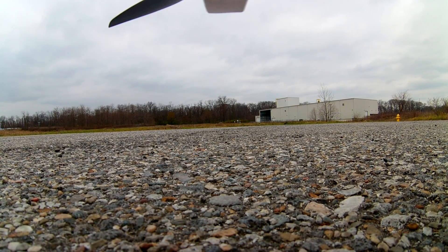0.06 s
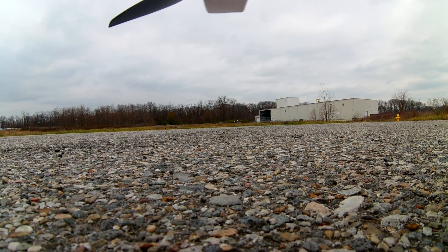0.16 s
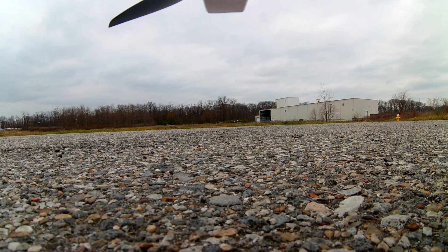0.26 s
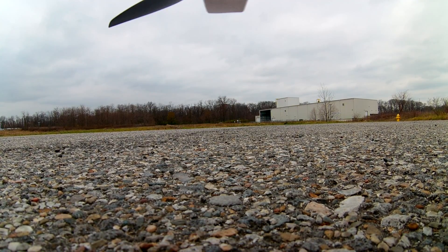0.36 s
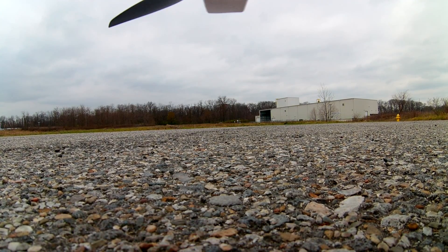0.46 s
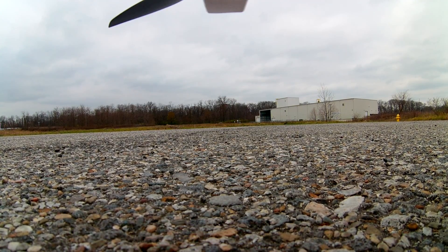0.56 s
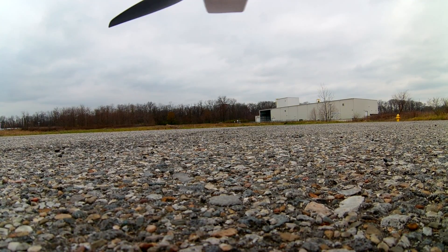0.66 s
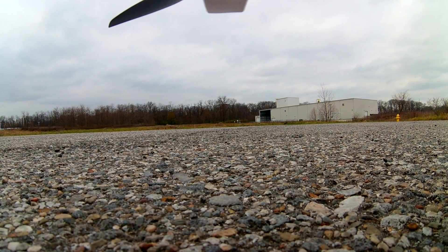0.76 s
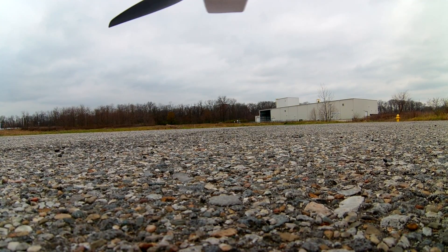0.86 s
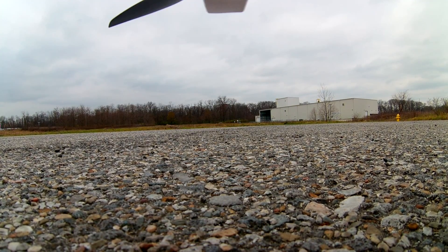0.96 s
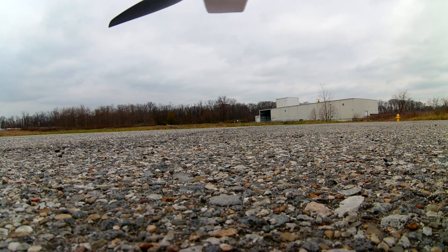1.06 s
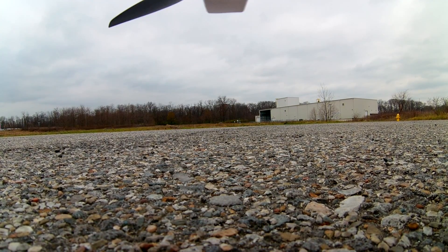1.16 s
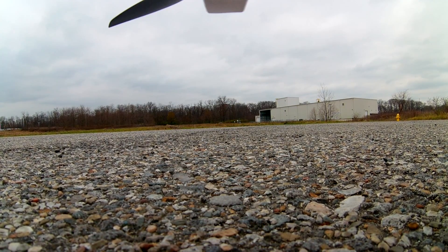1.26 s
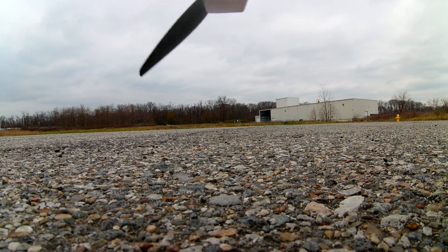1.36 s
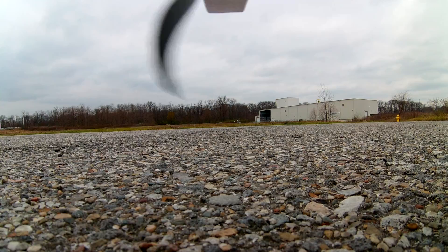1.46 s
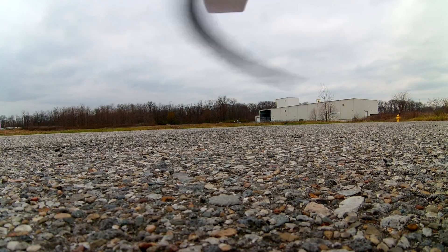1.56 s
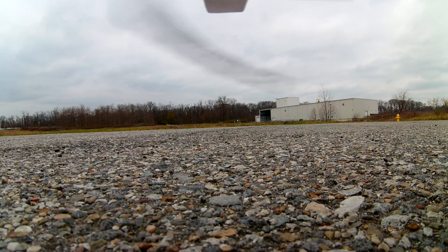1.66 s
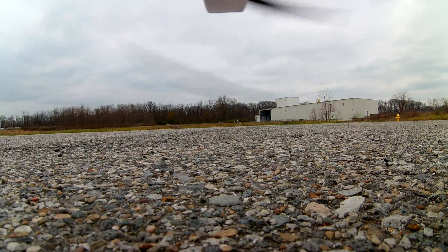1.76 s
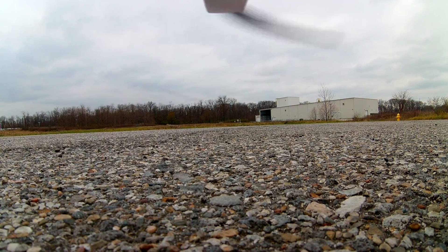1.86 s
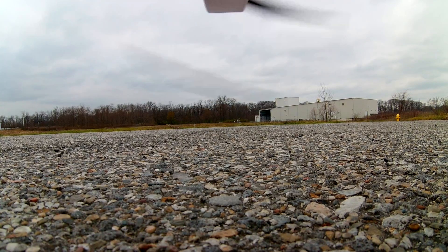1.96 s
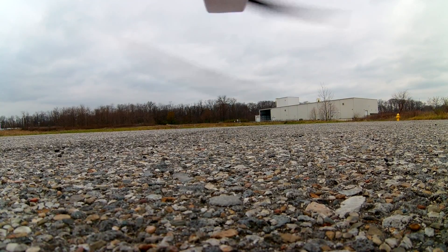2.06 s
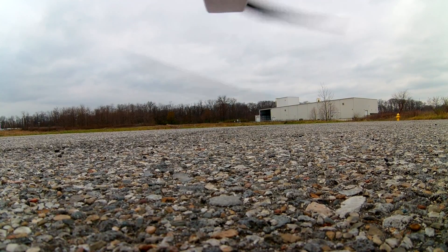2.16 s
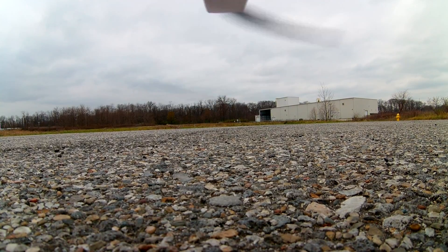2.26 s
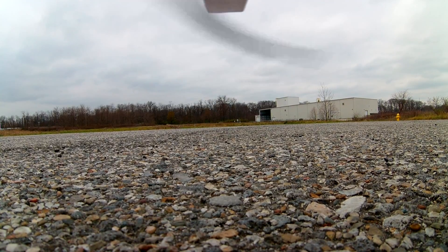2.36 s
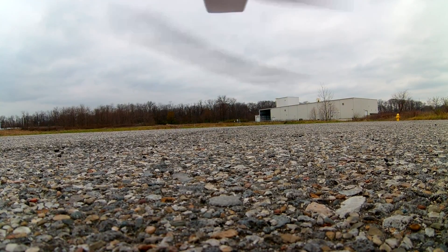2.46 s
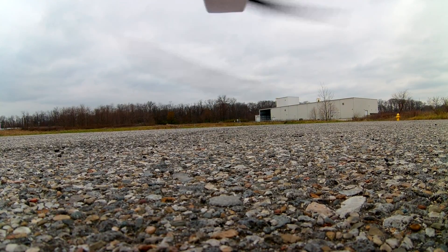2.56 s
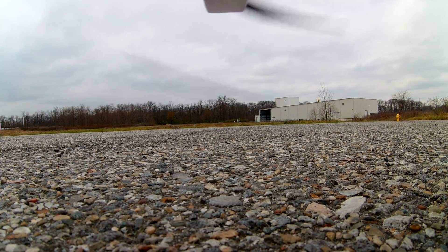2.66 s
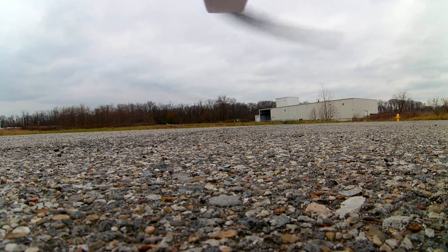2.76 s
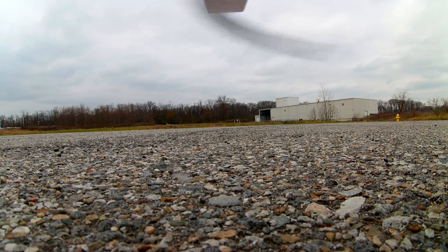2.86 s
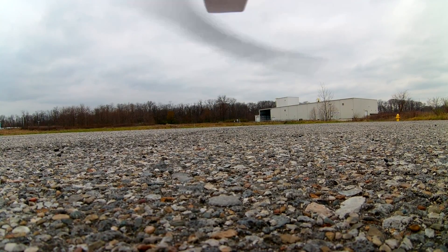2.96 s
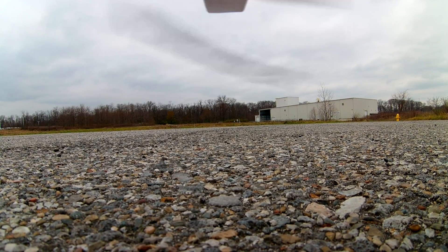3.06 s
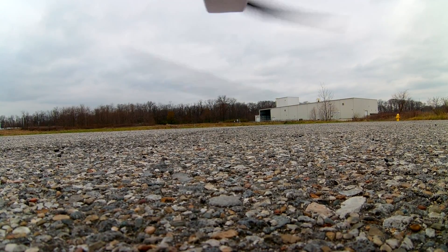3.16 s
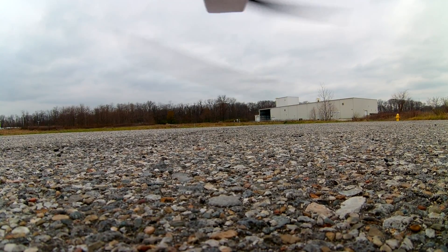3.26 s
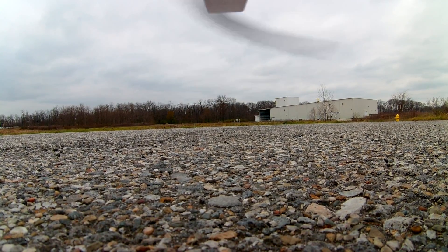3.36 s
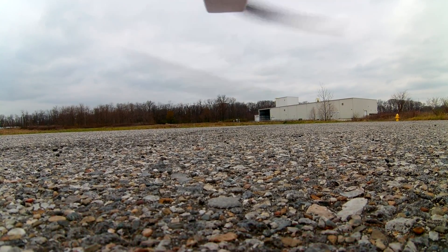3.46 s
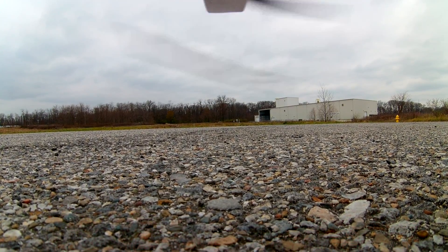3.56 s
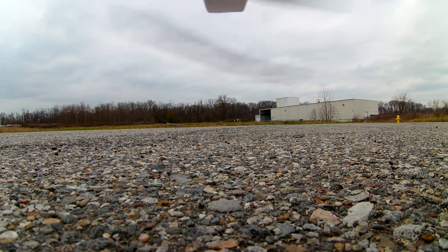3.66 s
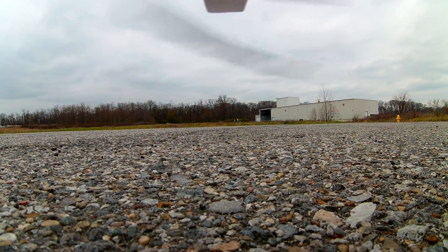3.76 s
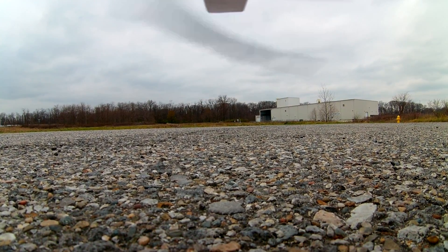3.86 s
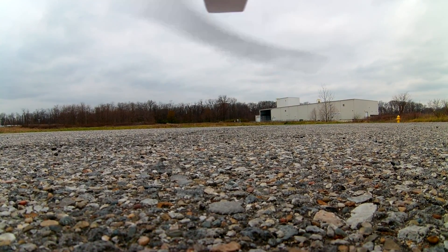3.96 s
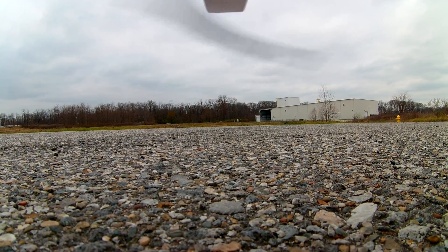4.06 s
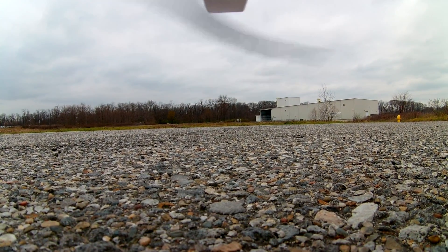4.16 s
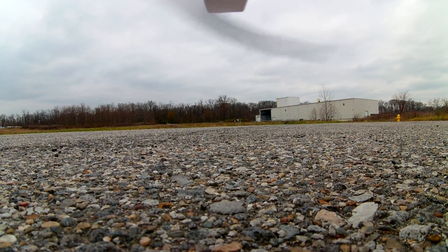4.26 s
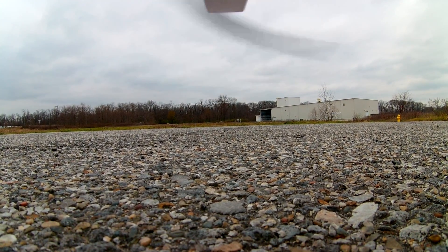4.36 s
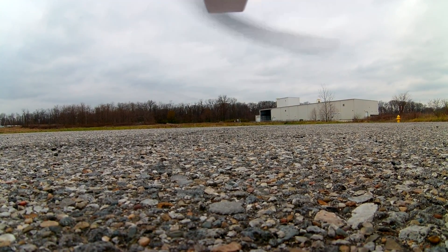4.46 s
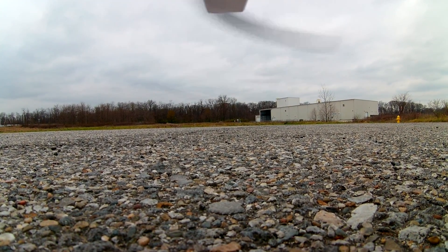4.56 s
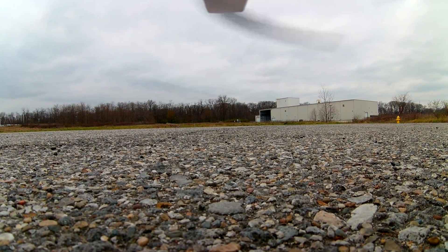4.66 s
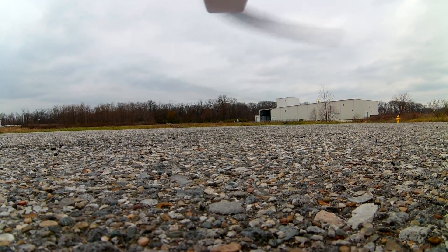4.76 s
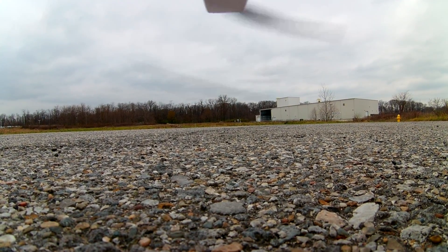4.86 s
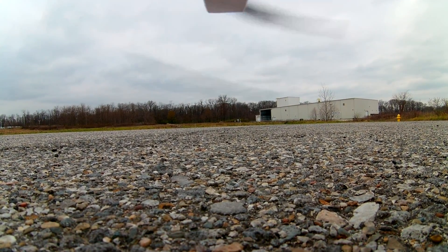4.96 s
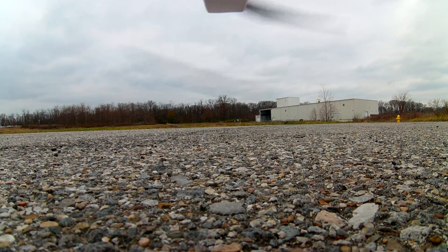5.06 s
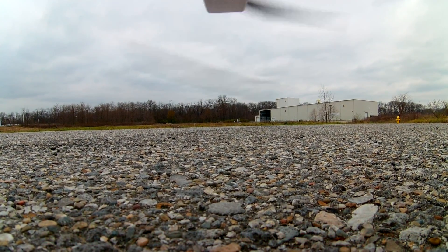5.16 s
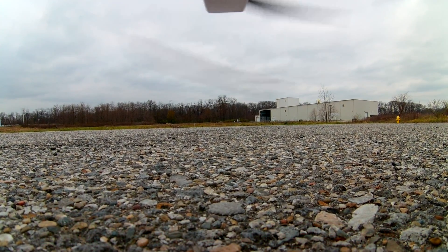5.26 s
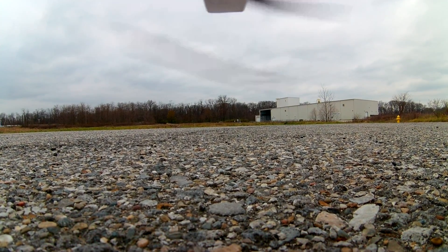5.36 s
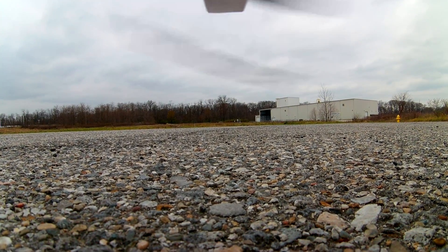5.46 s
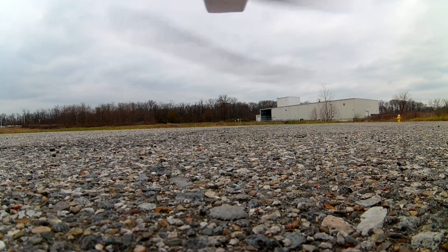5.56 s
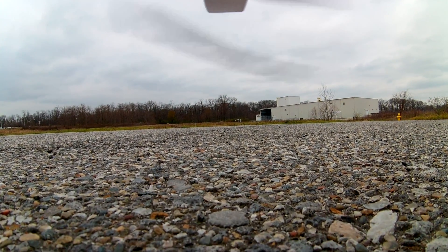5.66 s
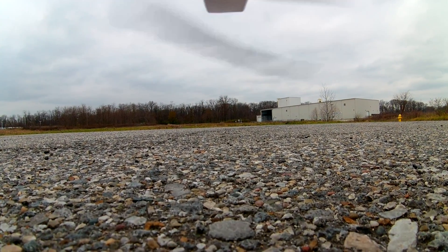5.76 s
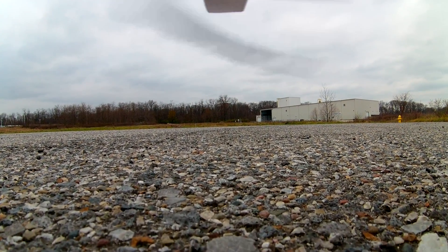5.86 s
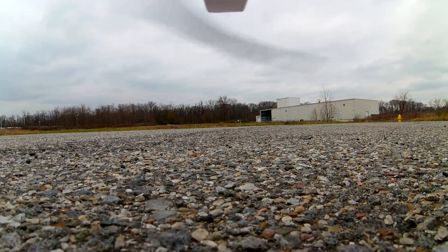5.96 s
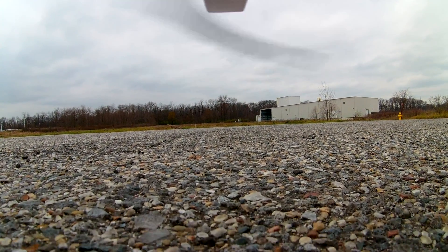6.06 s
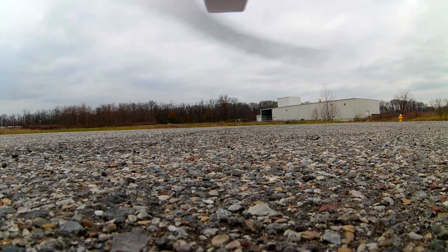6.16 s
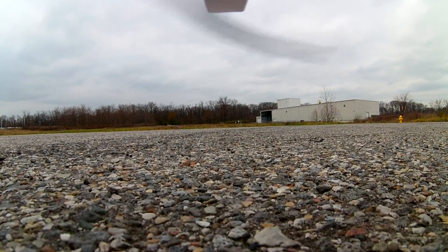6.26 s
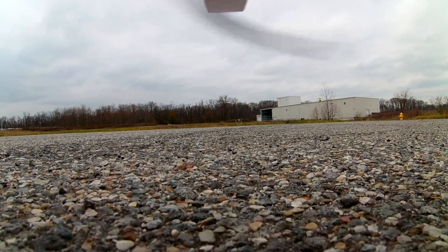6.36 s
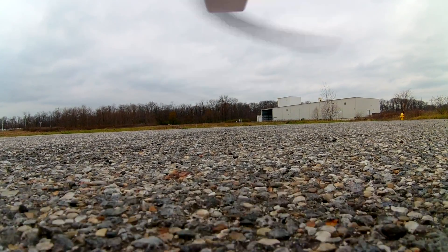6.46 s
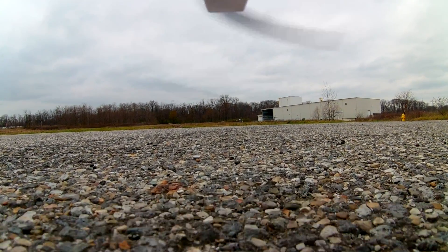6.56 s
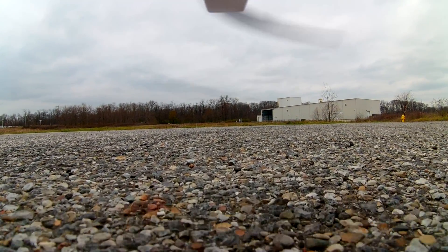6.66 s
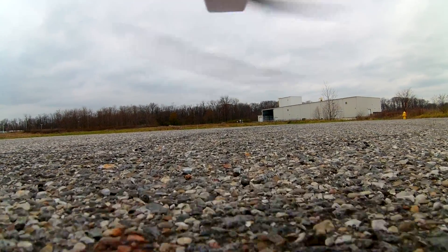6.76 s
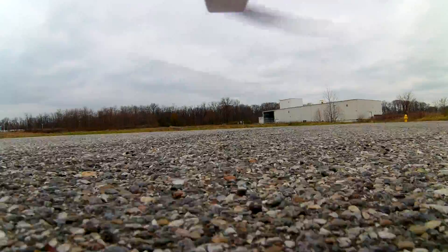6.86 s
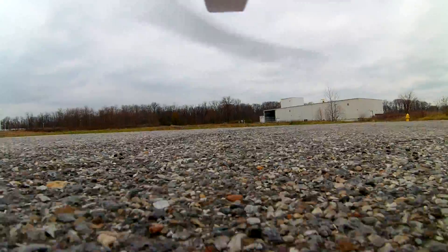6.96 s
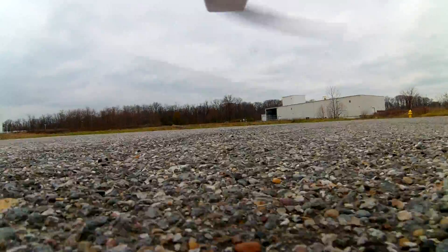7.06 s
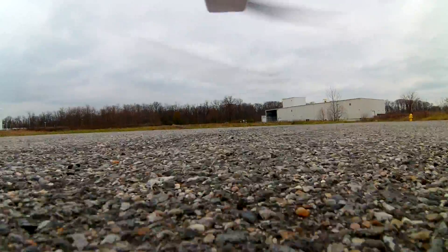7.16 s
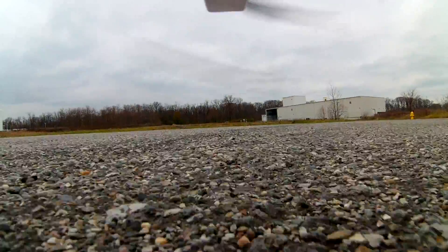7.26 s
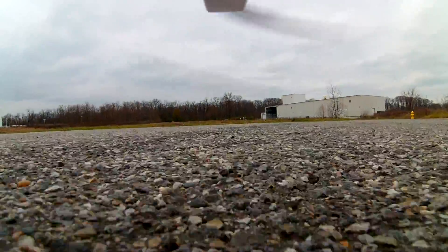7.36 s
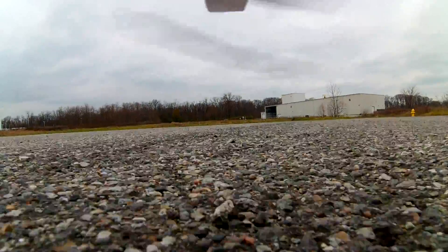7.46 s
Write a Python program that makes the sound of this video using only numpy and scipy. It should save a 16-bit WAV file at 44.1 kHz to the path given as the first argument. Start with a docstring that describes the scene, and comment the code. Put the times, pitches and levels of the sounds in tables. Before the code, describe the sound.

After faint scratchy ticks, a model plane's electric propeller starts and whirrs loudly, rising in small steps as its wash buffets the microphone.

```python
"""An open paved area, a small electric model plane standing on it, the microphone fixed under its nose.
Over a faint, far hiss the brushless motor twitches, catches at about 1.5 s and spins up; the throttle
is then nudged up three times. Propeller wash buffets the microphone, the motor rattles the airframe
and growls in its mount as it gains speed, and the speed controller whines thinly. Grit ticks twice."""
import sys
import numpy as np
from scipy import signal
from scipy.fft import rfft, irfft, next_fast_len
from scipy.io import wavfile

SR = 44100
rng = np.random.default_rng(int(sys.argv[2]) if len(sys.argv) > 2 else 0)


def to_wav(sig):
    """Store sig (one row per channel, or 1-D mono) as 16-bit WAV at the path in sys.argv[1].

    Samples outside -1..1 are clipped; the rate is SR.
    """
    pcm = np.clip(np.atleast_2d(sig), -1, 1) * 32767
    pcm = np.round(pcm).astype(np.int16)
    wavfile.write(sys.argv[1], SR, pcm.T)  # frames by channels


N = 330750

# Levels in the tables are relative.
# spectrum of the far hiss: f/Hz, level/dB
FAR_HISS_SPECTRUM = [(25, -34), (70, -20), (140, -22), (215, -8.5), (300, -15), (480, -14.5), (750, -6),
                     (1100, -1.5), (1600, -1), (2350, -10.5), (3100, -8.5), (3800, -16), (4600, -22),
                     (5600, -32.5), (8500, -34), (15000, -41)]
# tones of the distant hum: f/Hz, level/dB
FAR_HUM_TONES = [(63, -79), (82, -78), (222, -93)]
# scratchy ticks as the rotor twitches before it catches, later two sharp ticks of grit:
# t/s, level/dB, decay/s
SCRATCHY_TICKS = [(.048, -45, .003), (1.1243, -38.5, .004), (1.1553, -45, .0087), (1.1842, -39.5, 0.0086),
                  (1.2436, -38.5, .0054), (1.274, -38, .003), (1.3039, -41.5, .009), (1.3359, -42.5, 0.02),
                  (1.431, -47, .003), (3.245, -19, .002), (7.443, -11, .0044)]
# spectrum of the ticks and scratches: f/Hz, level/dB
SCRATCH_SPECTRUM = [(400, -29), (1500, 10), (3000, 2.5), (5500, -4), (7000, -13), (8500, -18), (12000, -22),
                    (13500, -38)]
# short runs of drive pulses knocking the motor mount: t/s, level/dB, length/s
PULSE_RUNS = [(1.337, -43, .003), (1.376, -39, .006), (1.414, -34.5, .011), (1.456, -37, .003),
              (1.466, -32, .02)]
# motor mount resonances: f/Hz, width/Hz, level/dB
MOUNT_MODES = [(653, 130, -8.5), (1120, 110, -11), (1635, 84, 4), (1990, 100, -1), (2500, 100, -3.5),
               (2980, 210, -3.5), (4300, 270, -15.5)]
# how the motor's metal bell radiates: f/Hz, level/dB
BELL_RESPONSE = [(6800, -20), (7200, -11), (7500, 0), (8200, -3), (8700, -1), (9100, 2.5), (9400, 0),
                 (10400, -4), (10750, 9), (11050, 2), (11350, -6), (12000, -9), (12800, -35)]
# throttle steps: t/s, shaft speed asked for/(turns per s)
THROTTLE_STEPS = [(1.445, 39), (1.528, 71.1), (3.19, 79.95), (6.71, 88.5), (7.29, 97)]
# whine lines beside the switching tone: offset/(multiples of shaft speed), level/dB
WHINE_LINES = [(-14, 6), (14, 1.5), (15, -14), (21, -15), (28, -16), (42, 2), (84, -2)]
# motor tones, from 14 magnets and 42 commutations a turn: f/(multiples of shaft speed), level/dB
MOTOR_TONES = [(13, 3), (21, -18), (25, 0), (29, -1.5), (30, -22), (31, -4.5), (36, -1), (37, -10),
               (42, -7), (43, -5.5), (47, -22), (56, -3.5), (84, -11)]
# airframe resonances: f/Hz, width/Hz, level/dB
AIRFRAME_MODES = [(580, 89, -19), (1090, 150, -18), (1626, 180, -6.5), (1819, 160, -2), (2496, 198, 1.5),
                  (3033, 145, -0.5), (3307, 220, -7), (3980, 360, -12.5), (4535, 230, -16)]
# slow swell of the rattle, on top of what shaft speed gives: t/s, level/dB
RATTLE_SWELL_CURVE = [(1.8, 0), (3.6, -0.2), (5.7, 0), (6.2, 1.3), (7.4, 0.1)]
# slow swell of the wash, likewise: t/s, level/dB
WASH_SWELL_CURVE = [(1.8, -0.9), (2.45, 0.7), (2.85, -.6), (3.3, 1.8), (3.6, 0), (4.1, 0.54), (5.5, -0.75),
                    (6.4, 0.65), (7.0, -0.46), (7.45, 0.7)]
# spectrum of the wash roaring on the microphone: f/Hz, level/dB
ROAR_SPECTRUM = [(20, -49), (70, -27), (130, -24.5), (250, -13.5), (430, -3.5), (600, -0.5), (950, 2),
                 (1400, 0.5), (2100, -5.5), (3200, -3.5), (4200, -14), (5200, -33), (8000, -53.5)]
# spectrum of the wash's spitting top: f/Hz, level/dB
SPIT_SPECTRUM = [(2000, -26), (4000, 3.5), (5200, 5.5), (7200, -3.5), (8600, -14), (10000, -13),
                 (11000, -9), (12400, -16.5), (13300, -30), (15000, -52)]


def from_db(db):
    """Decibels to gain."""
    return 10 ** (np.asarray(db) / 20)


def rms_one(x):
    """Scale to unit power."""
    return x / np.sqrt(np.mean(x ** 2) + 1e-20)


def in_time(curve):
    """A curve of (t/s, value) points at every sample."""
    return np.interp(np.arange(N) / SR, *np.transpose(curve))


def drift(rate):
    """Random wander of spread 1, with `rate` new values a second."""
    knots = rng.standard_normal(int(N / SR * rate) + 2)
    return rms_one(np.interp(np.arange(N) / SR * rate, np.arange(len(knots)), knots))


def lag(x, seconds):
    """Follow x with this time constant."""
    keep = np.exp(-1 / (seconds * SR))
    return signal.lfilter([1 - keep], [1, -keep], x)


def doublings(speed, cruise_turns_per_s=80):
    """Shaft speed in octaves above cruise."""
    return np.log2(speed / cruise_turns_per_s + 1e-9)


def colour(x, spectrum):
    """Causal (minimum-phase) filter with this spectrum; white noise keeps its power."""
    hz, db = np.transpose(spectrum)
    size = next_fast_len(N + SR // 2) // 2 * 2
    bin_hz = np.fft.rfftfreq(size, 1 / SR)
    gain = rms_one(from_db(np.interp(np.log(bin_hz + 1), np.log(hz), db)))
    cepstrum = irfft(np.log(gain))
    cepstrum[1:size // 2] *= 2
    cepstrum[size // 2 + 1:] = 0
    return irfft(rfft(x, size) * np.exp(rfft(cepstrum)))[:N]


def resonate(force, modes):
    """Parallel resonances of the plane, signs alternating; its foam body soaks up the treble."""
    ringing, power = 0, 0
    for k, (hz, width, db) in enumerate(modes):
        r = np.exp(-np.pi * width / SR)
        zeros = np.array([1, 0, -1]) * (1 - r * r) / 2
        poles = [1, -2 * r * np.cos(2 * np.pi * hz / SR), r * r]
        ringing += (-1) ** k * from_db(db) * signal.lfilter(zeros, poles, force)
        power += from_db(db) ** 2 * np.pi * width / SR
    foam = signal.butter(4, 4800, fs=SR, output="sos")
    return signal.sosfilt(foam, ringing) / np.sqrt(power)


def outdoors(hiss_db=-50, waver_db=4):
    """Far from the microphone: a steady hiss and a faint, wavering low hum."""
    t = np.arange(N) / SR
    hum = sum(from_db(db - waver_db * drift(6)) * np.sin(2 * np.pi * hz * t + .5 * drift(5))
              for hz, db in FAR_HUM_TONES)
    return from_db(hiss_db) * colour(rng.standard_normal(N), FAR_HISS_SPECTRUM) + hum


def bursts(rows):
    """Short bursts of noise from rows of t/s, level/dB, decay/s."""
    envelope = np.zeros(N)
    for s, db, decay in rows:
        start = round(s * SR)
        age = np.arange(N - start) / SR
        envelope[start:] += from_db(db) * np.exp(-np.minimum(age / decay, 20))
    return envelope * rng.standard_normal(N)


def ticks_and_knocks(knocks_per_s=240, knock_decay_s=.0028):
    """The rotor twitches, the first drive pulses knock the mount and bell; later grit ticks twice."""
    knocks = bursts([(s + later, db, knock_decay_s) for s, db, length in PULSE_RUNS
                     for later in np.arange(0, length, 1 / knocks_per_s)])
    scratches = colour(bursts(SCRATCHY_TICKS) + from_db(-20) * knocks, SCRATCH_SPECTRUM)
    bell_ticks = from_db(-28) * colour(knocks, BELL_RESPONSE)
    return resonate(knocks, MOUNT_MODES) + bell_ticks + scratches


def shaft(throttle_lag_s=.012, spin_up_s=.14, strain_lag_s=.023):
    """Speed eases towards each throttle step; strain (0-1) peaks when turning and gaining fast."""
    asked = np.zeros(N)
    for s, turns_per_s in THROTTLE_STEPS:
        asked[round(s * SR):] = turns_per_s
    asked = lag(asked, throttle_lag_s)
    speed = lag(asked, spin_up_s)
    strain = lag(np.maximum(asked - speed, 0) * np.sqrt(speed), strain_lag_s)
    return speed, strain / strain.max()


def controller_whine(speed, turns, strain, switching_hz=7987, waver_db=1.5):
    """Commutation chops the switching tone: lines fan out from it and sweep the bell's resonances."""
    switching_cycles = switching_hz * np.arange(N) / SR
    whine_db = -59 + 8 * doublings(speed) + 10 * strain
    upper_lines_db = -2 - 3 * strain
    # uneven commutation adds a fine sizzle once the shaft turns
    turning = np.minimum(speed / 12, 1) ** 2
    sizzle = from_db(-63) * turning * colour(rng.standard_normal(N), BELL_RESPONSE)
    whine = np.zeros(N)
    for order, db in WHINE_LINES:
        line_db = whine_db + db + (order > 20) * upper_lines_db + waver_db * drift(10)
        bell_db = np.interp(switching_hz + order * speed, *np.transpose(BELL_RESPONSE))
        whine += from_db(line_db + bell_db) * np.sin(2 * np.pi * (switching_cycles + order * turns))
    return sizzle + (speed > 0) * whine


def mount_growl(turns, strain, commutations=42, magnets=14, rough_db=2, strain_knee=.4):
    """Under strain, rough torque ripple sweeps up the mount's resonances and the rotor scratches."""
    angle = 2 * np.pi * turns
    ripple = from_db(-8) * np.sin(commutations * angle) + from_db(-22) * np.sin(magnets * angle)
    envelope = from_db(-33) * np.tanh(strain / strain_knee)
    torque = envelope * (strain * ripple + rng.standard_normal(N))
    torque *= rms_one(from_db(rough_db * drift(250)))
    return resonate(torque, MOUNT_MODES) + from_db(-15) * colour(torque, SCRATCH_SPECTRUM)


def rough_noise(turns, blade_db, burst_db, gust_db):
    """Noise in millisecond bursts that swells as each of the two blades goes by."""
    swell_db = blade_db * np.cos(2 * 2 * np.pi * turns) + burst_db * drift(1100) + gust_db * drift(90)
    return rms_one(rng.standard_normal(N) * from_db(swell_db))


def motor_rattle(speed, turns, strain, flutter_db=.34, waver_db=1.5):
    """Bearing rattle and magnetic tones shake the airframe; strain brings the tones forward."""
    level_db = -21.5 + 8 * doublings(speed) + in_time(RATTLE_SWELL_CURVE) + flutter_db * drift(13)
    bearings = rough_noise(turns, blade_db=.8, burst_db=2.5, gust_db=1)
    tones = sum(from_db(db + waver_db * drift(14)) * np.sin(2 * np.pi * (order * turns + rng.random()))
                for order, db in MOTOR_TONES)
    force = bearings + from_db(-21 + 4 * strain) * tones
    return resonate(from_db(level_db) * force, AIRFRAME_MODES)


def propeller_wash(speed, turns, air_lag_s=.036, chop_db=1.9, puff_db=1.8):
    """Wash hits the microphone as a roar with a spitting top; blades and unbalance add a low hum."""
    flow_doublings = doublings(lag(speed, air_lag_s))
    surge_db = in_time(WASH_SWELL_CURVE) + .6 * drift(13)
    roar_db = -20.5 + 18.5 * flow_doublings + surge_db
    spit_db = -39.5 + 30 * flow_doublings + surge_db
    angle = 2 * np.pi * turns
    eddies = rough_noise(turns, blade_db=.04, burst_db=2.03, gust_db=.56)
    # the finest eddies come in sharper puffs, tied to the blades
    puffs = rms_one(eddies * from_db(chop_db * np.cos(2 * angle) + puff_db * drift(500)))
    roar, spit = colour(eddies, ROAR_SPECTRUM), colour(puffs, SPIT_SPECTRUM)
    hum = from_db(-35) * np.sin(2 * angle) + from_db(-46) * np.sin(angle)
    return from_db(roar_db) * (roar + hum) + from_db(spit_db) * spit


def scene():
    """One microphone, close under the plane and in the open, so the sound is dry."""
    speed, strain = shaft()
    turns = np.cumsum(speed) / SR
    mix = outdoors() + ticks_and_knocks()
    mix += controller_whine(speed, turns, strain) + mount_growl(turns, strain)
    mix += motor_rattle(speed, turns, strain) + propeller_wash(speed, turns)
    return mix[None]


def record(dry, notch_hz=7960, notch_width_hz=800, cutoff_hz=15600):
    """The small camera's microphone has a narrow notch in the treble and a steep top cut."""
    notch = signal.iirnotch(notch_hz, notch_hz / notch_width_hz, fs=SR)
    top_cut = signal.ellip(10, .2, 80, cutoff_hz, fs=SR, output="sos")
    return signal.sosfilt(top_cut, signal.lfilter(*notch, dry))


dry = scene()
out = record(dry)
to_wav(out)
```